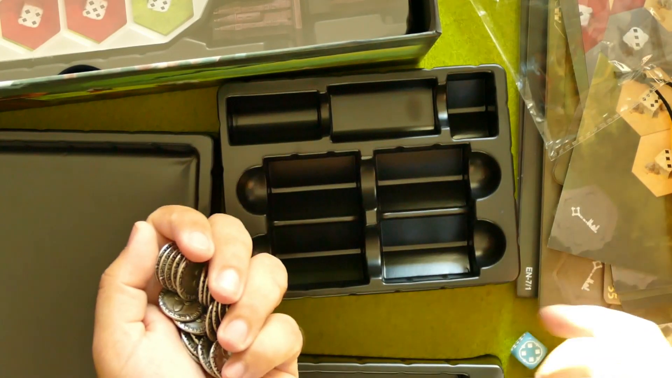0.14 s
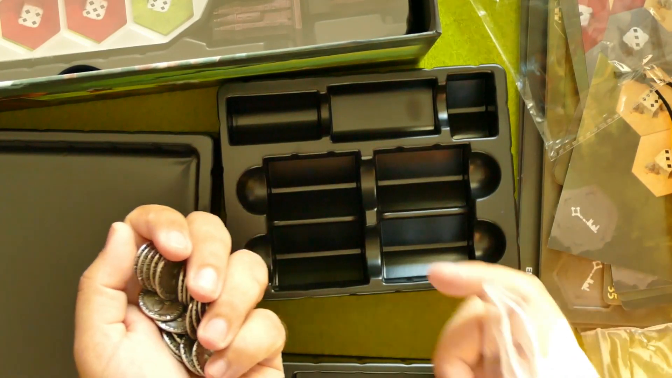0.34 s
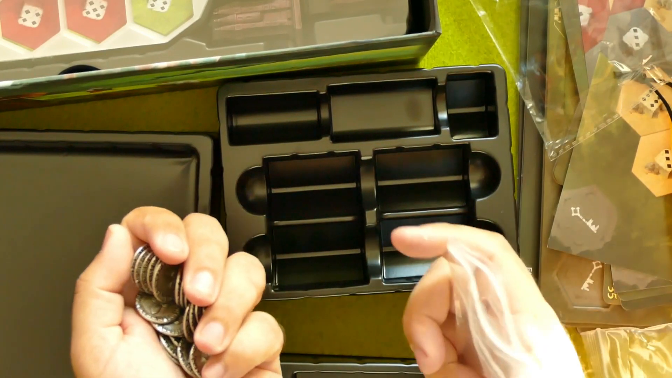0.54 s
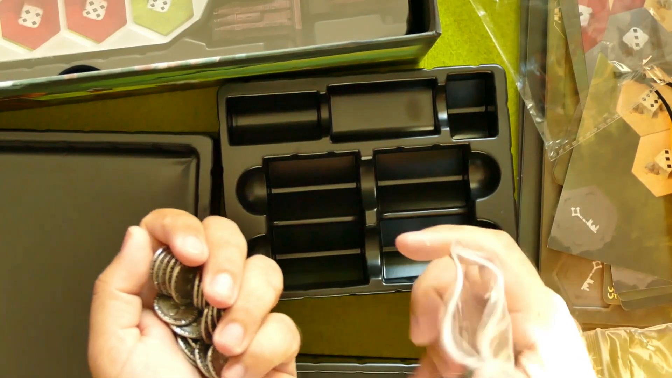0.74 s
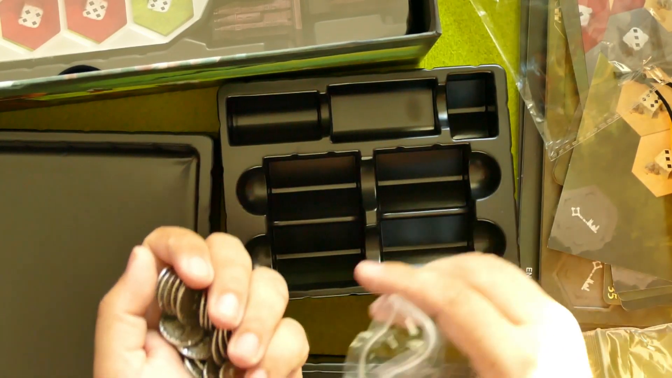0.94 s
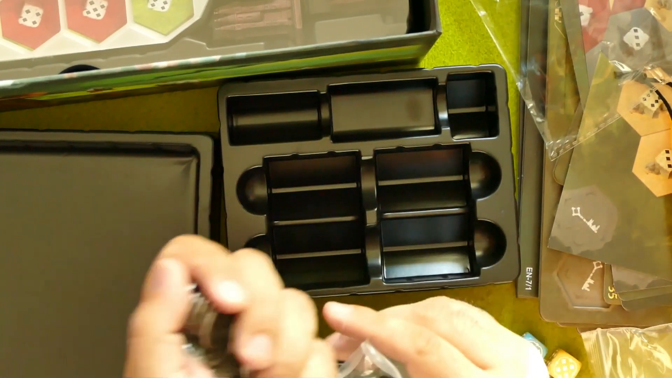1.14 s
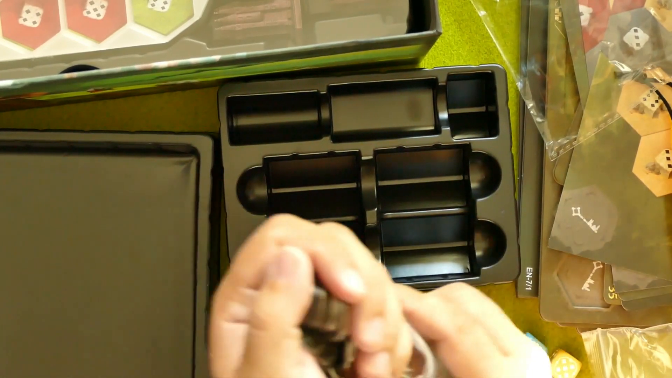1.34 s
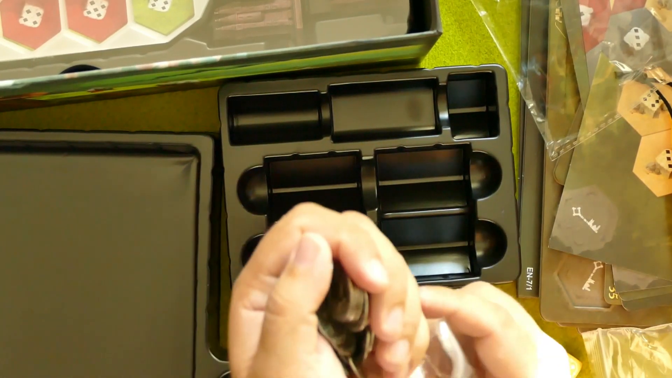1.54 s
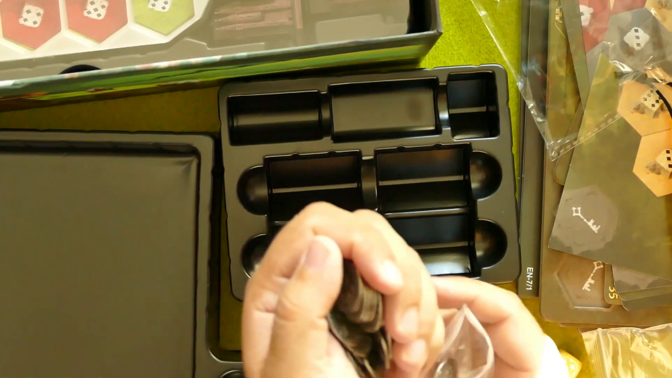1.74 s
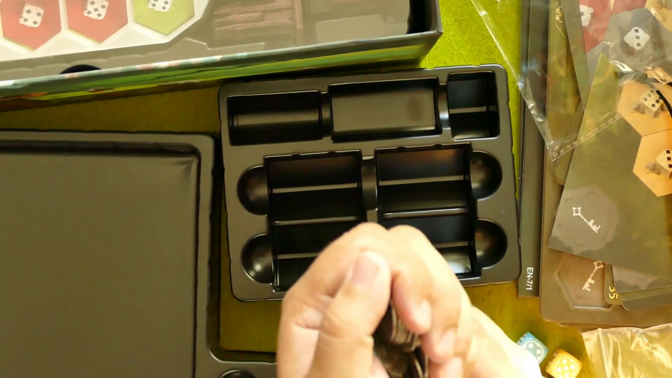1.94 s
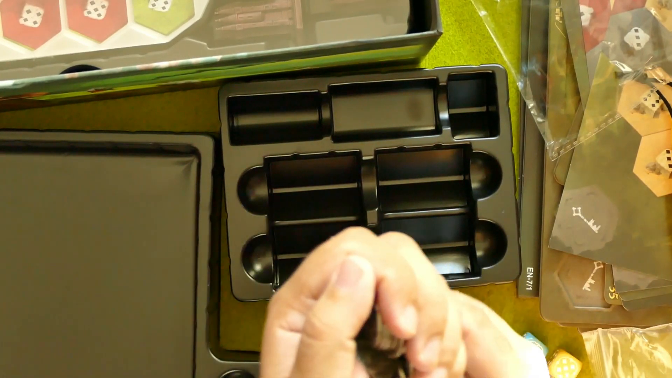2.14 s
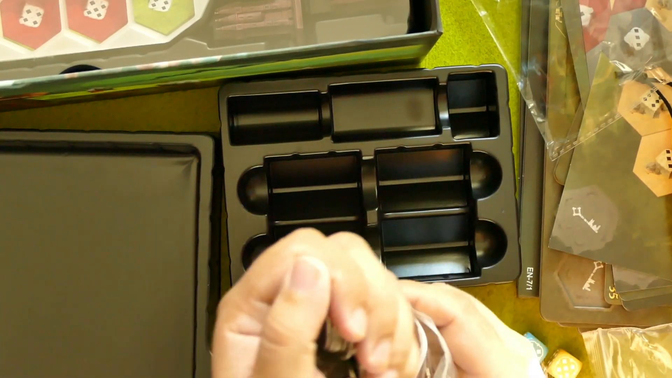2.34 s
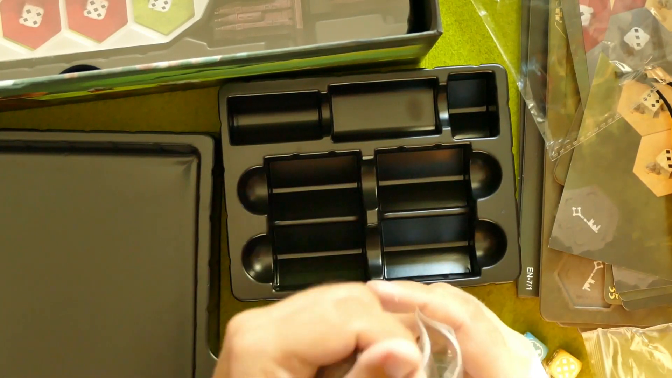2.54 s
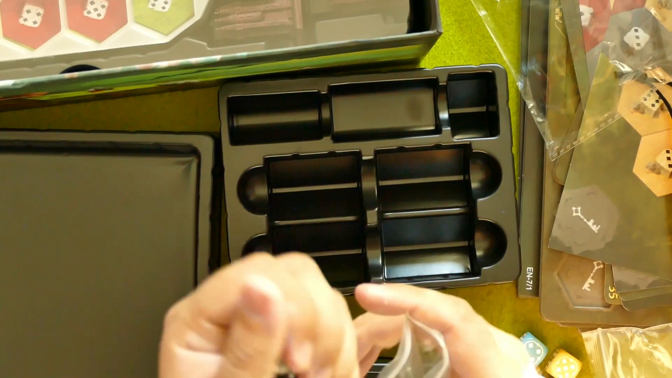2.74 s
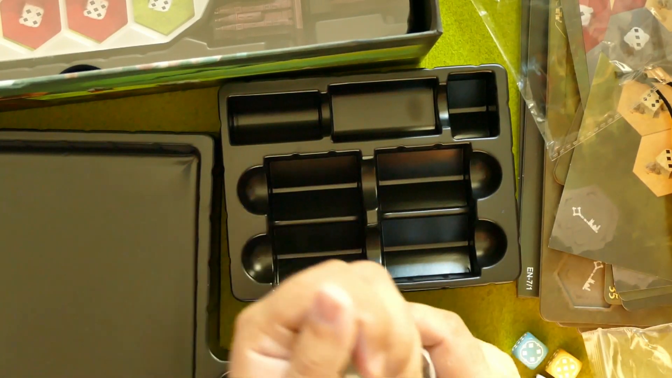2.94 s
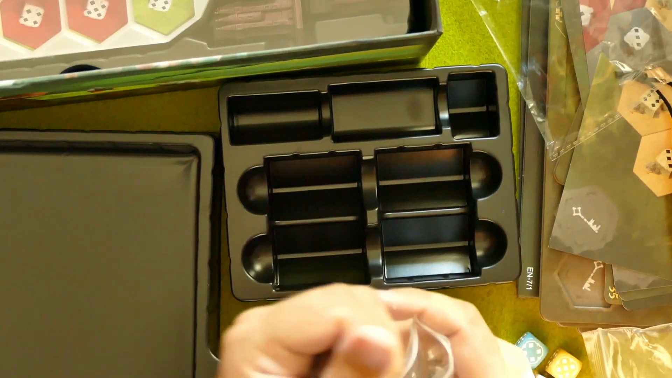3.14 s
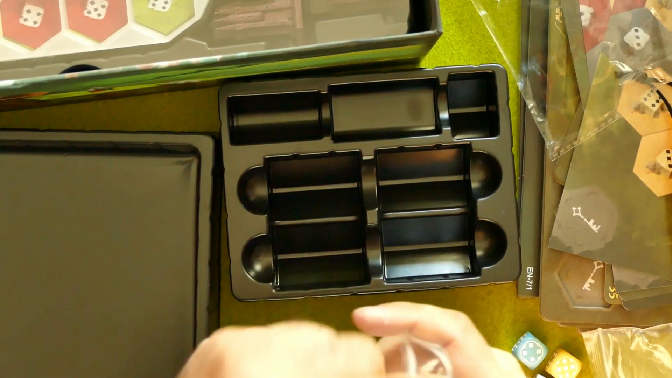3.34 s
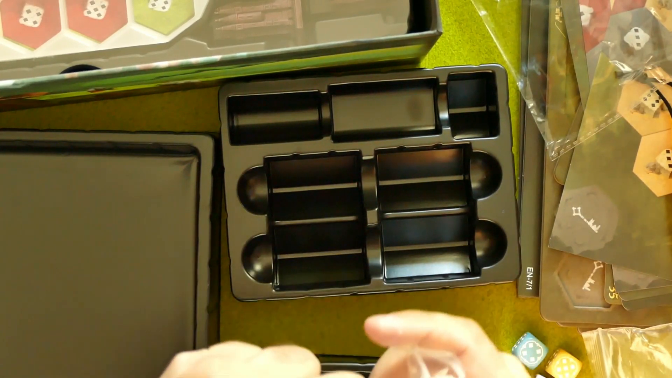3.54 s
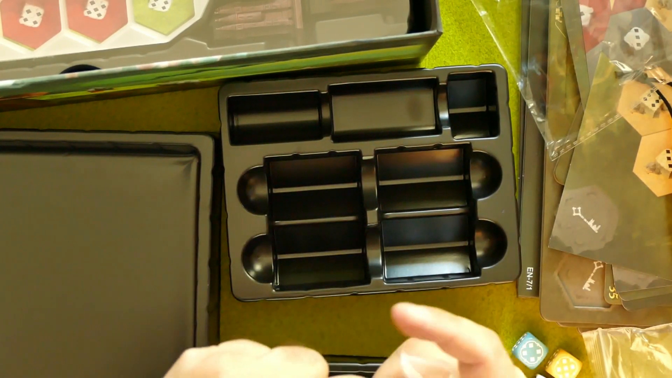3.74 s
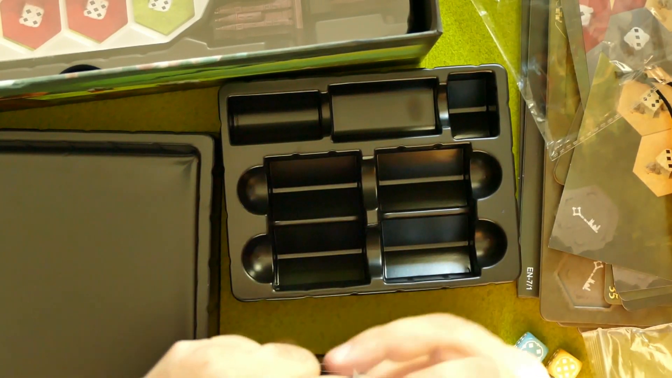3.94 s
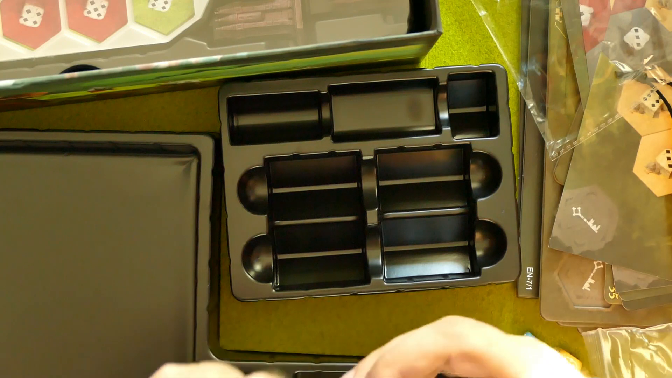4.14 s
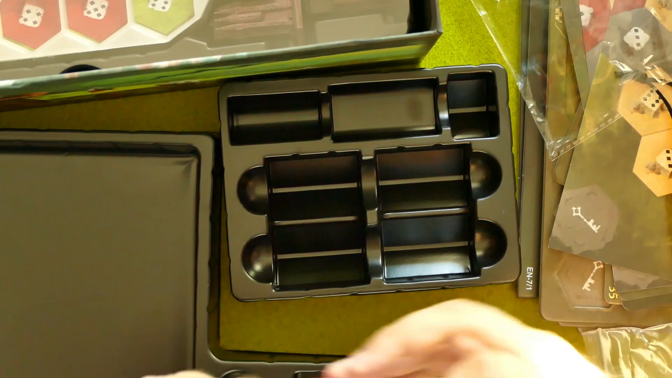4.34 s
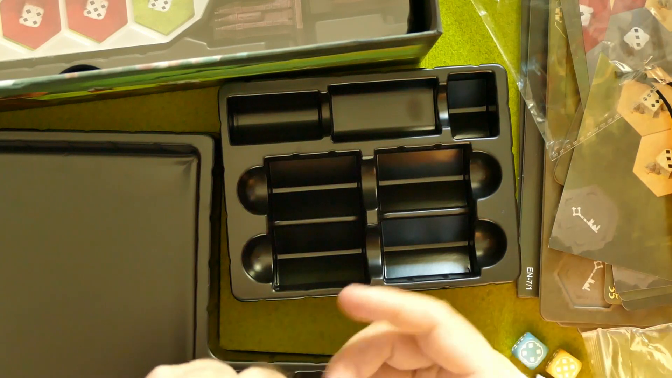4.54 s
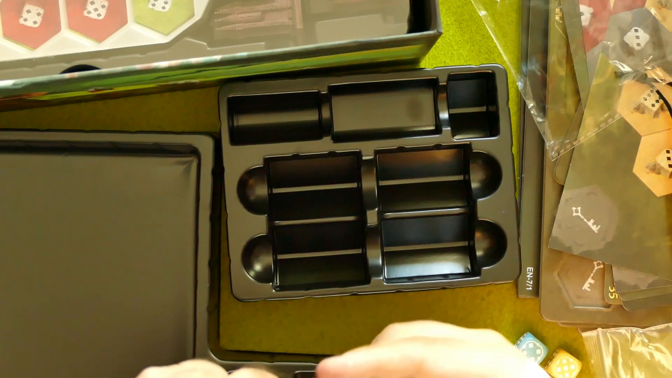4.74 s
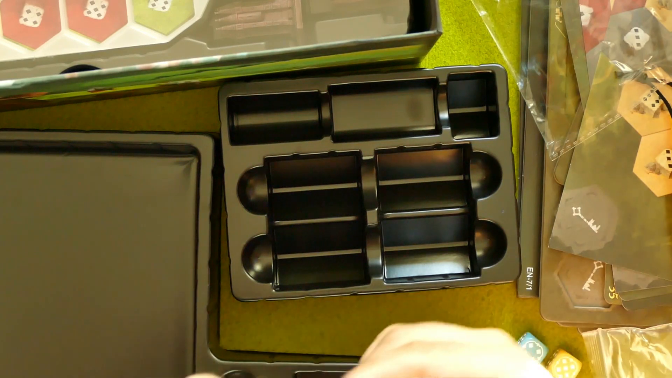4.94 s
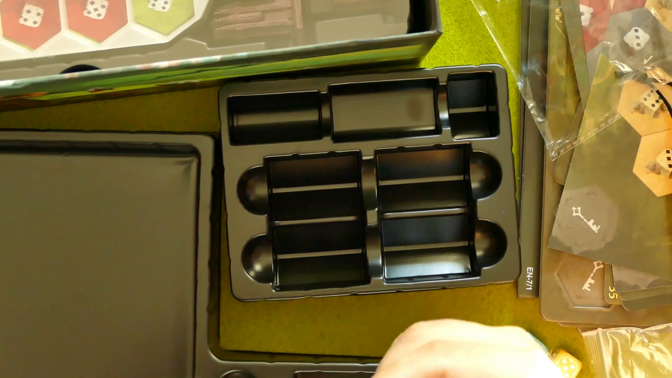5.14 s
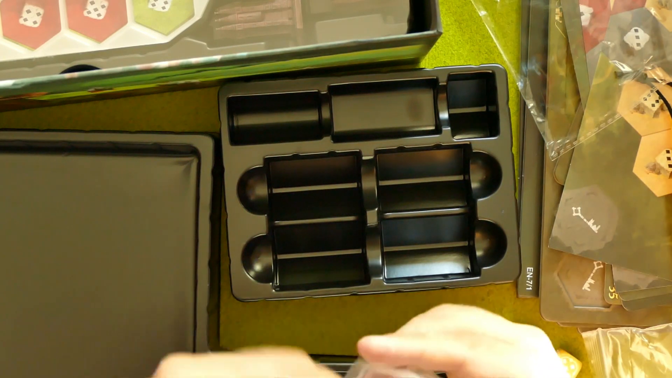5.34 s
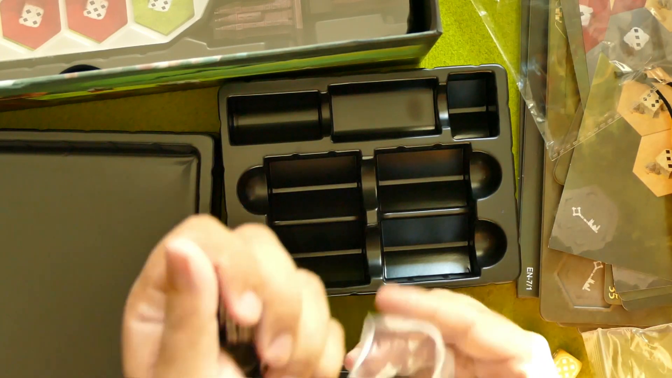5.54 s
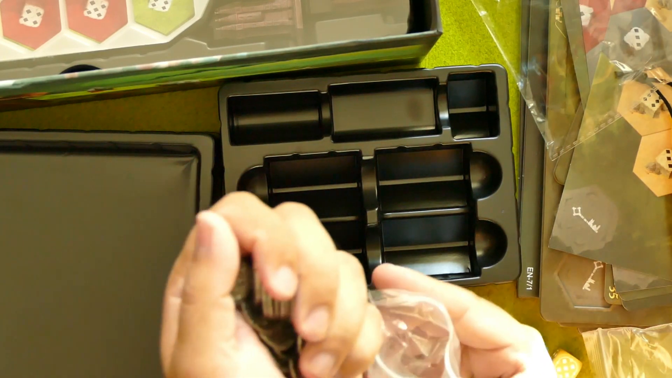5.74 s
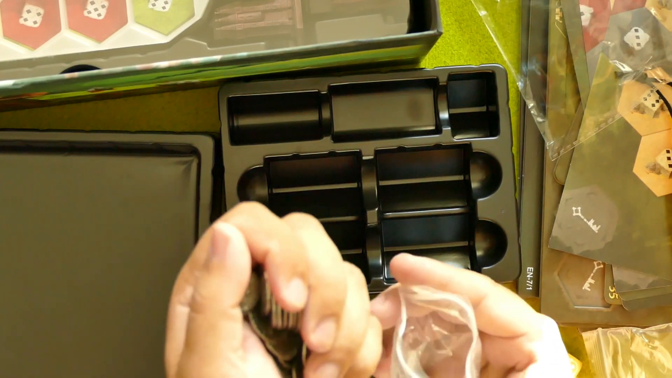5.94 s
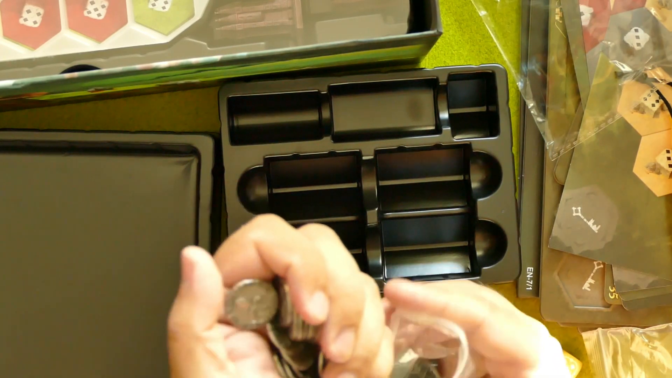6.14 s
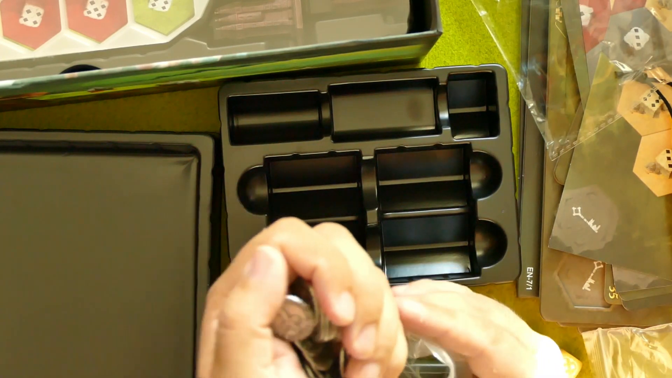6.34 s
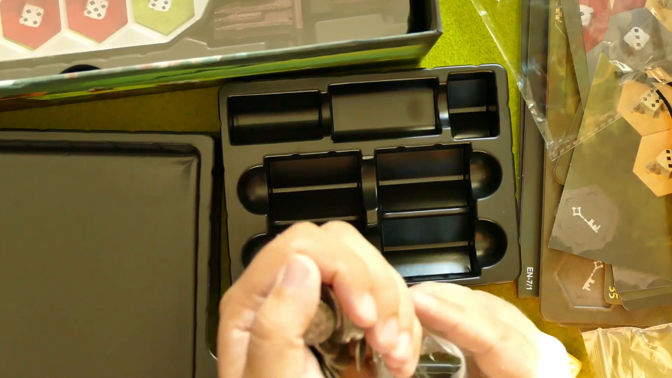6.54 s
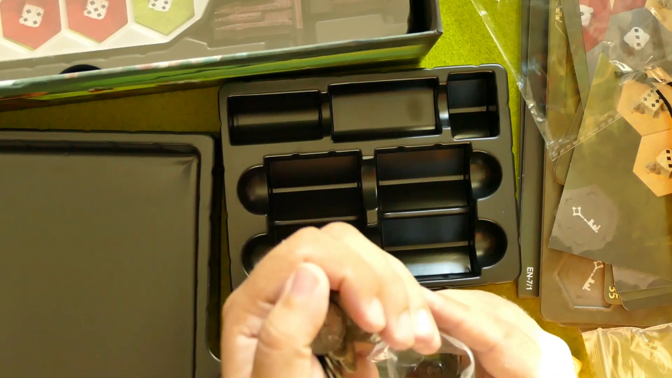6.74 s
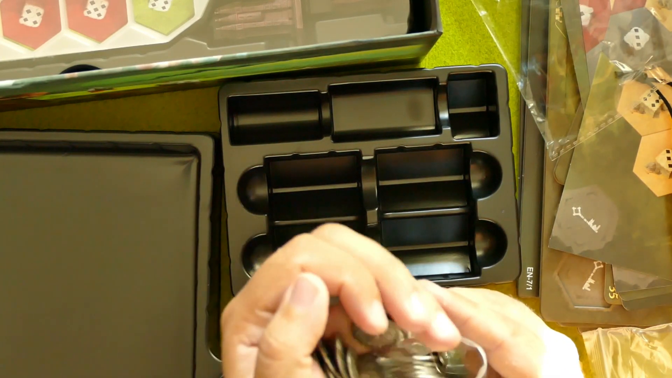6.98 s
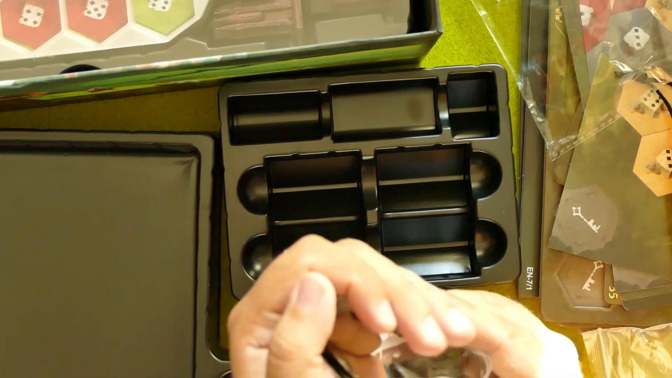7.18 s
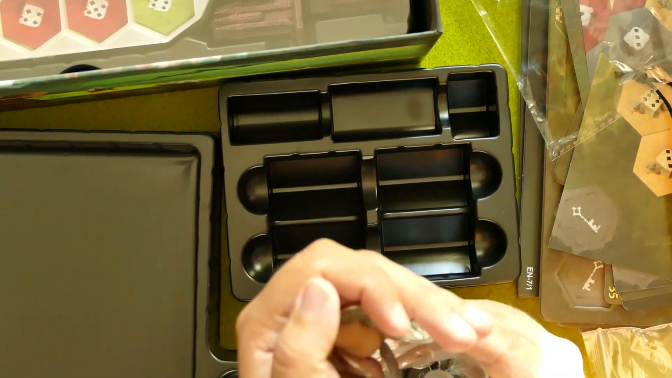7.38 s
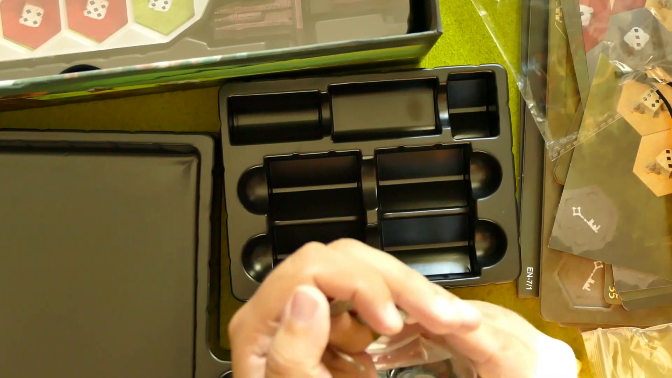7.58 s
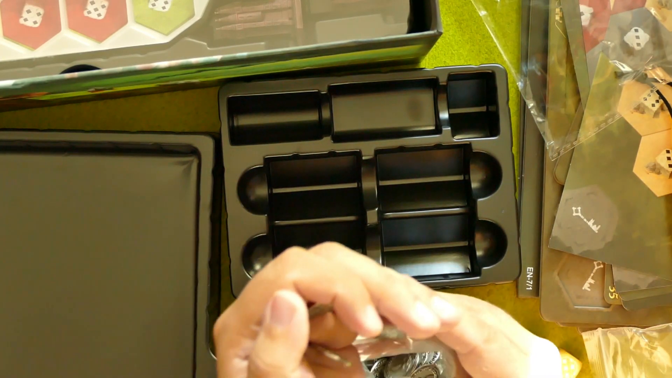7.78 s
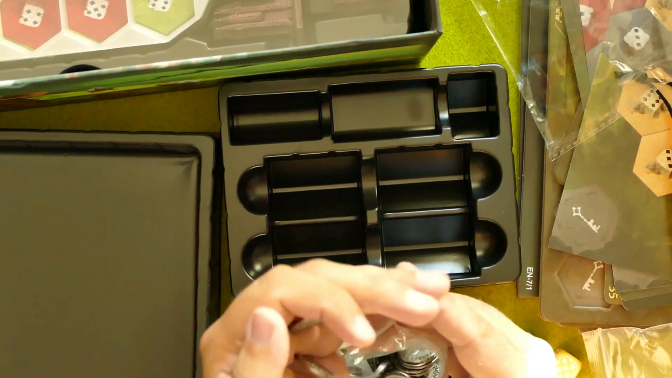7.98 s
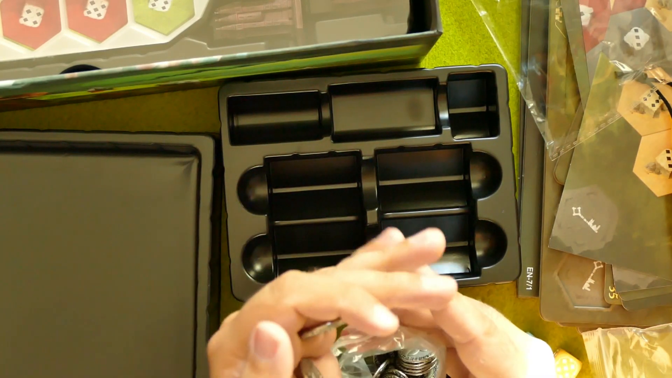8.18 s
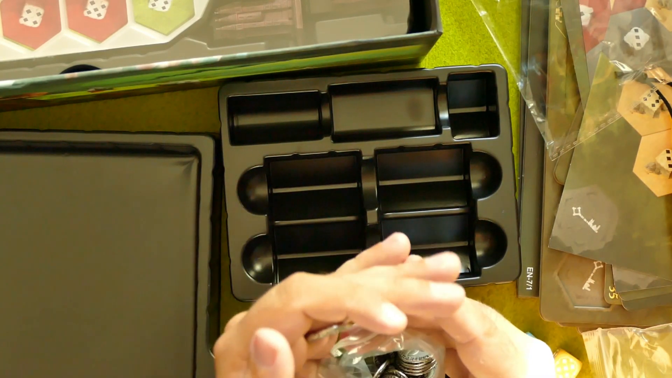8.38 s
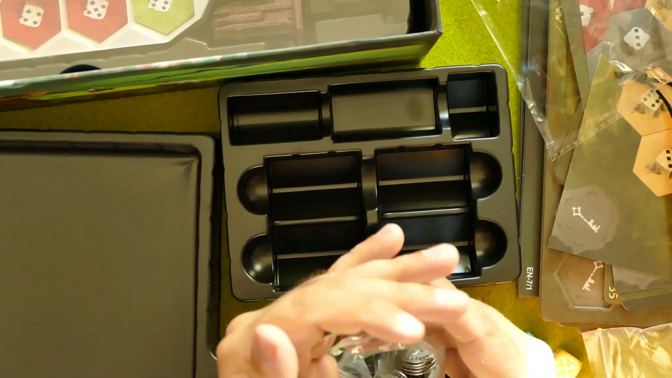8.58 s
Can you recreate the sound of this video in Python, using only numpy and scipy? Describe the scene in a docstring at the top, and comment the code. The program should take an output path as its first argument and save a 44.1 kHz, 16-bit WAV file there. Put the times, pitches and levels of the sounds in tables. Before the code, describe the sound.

Close, dry crackling of a plastic bag between sparse coin clinks, ending in a rapid metallic jingle and a dense rattling drop into the bag.

```python
"""Metal coins, a handful, are tipped into a small plastic bag close to the microphone in a quiet room.
They clink singly as decaying sines, then pour in a jingle of clicked resonators with a bright sliding hiss.
They knock and rattle on the heap as noise sounding through the resonances of the bag.
The film snaps and crinkles in filtered noise as fingers work it; short echoes and hiss lie behind."""
import sys
import numpy as np
from scipy import signal
from scipy.fft import rfft, irfft
from scipy.io import wavfile

SR = 44100
rng = np.random.default_rng(int(sys.argv[2]) if len(sys.argv) > 2 else 0)


def bounce(signal):
    """Save signal as a 16-bit WAV file at the path given by the first command-line argument."""
    frames = np.transpose(np.atleast_2d(signal))
    limited = np.clip(frames, -1, 1)
    pcm = np.round(limited * 32767).astype(np.int16)
    wavfile.write(sys.argv[1], SR, pcm)


N = 379877


def amp(db):
    """Gain of a level in dB."""
    return 10 ** (np.asarray(db) / 20)


def rms_one(x):
    """Scaled to rms 1."""
    return x / np.sqrt(np.mean(x ** 2) + 1e-20)


def in_time(rows):
    """Columns of a curve, one value a sample, -120 dB outside it."""
    s, *columns = np.transpose(rows)
    t = np.arange(N) / SR
    return [np.interp(t, s, column, left=-120, right=-120) for column in columns]


def swells(start_s, held_s, db, rise_db_per_s, fall_db_per_s):
    """Summed gains of gestures that rise, hold and die away at steady rates in dB."""
    t = np.arange(0, N / SR + .002, .001)[:, None]
    rise_db = rise_db_per_s * np.maximum(start_s - t, 0)
    fall_db = fall_db_per_s * np.maximum(t - start_s - held_s, 0)
    gain = amp(db - rise_db - fall_db).sum(axis=1)
    return np.interp(np.arange(N) / SR, t[:, 0], gain)


def resonance(x, hz, width_hz):
    """Two-pole peak with gain 1 on top."""
    r = np.exp(-np.pi * width_hz / SR)
    zeros = np.array([1, 0, -1]) * (1 - r * r) / 2
    poles = [1, -2 * r * np.cos(2 * np.pi * hz / SR), r * r]
    return signal.lfilter(zeros, poles, x + 1e-18)


def ring(clicks, hz, t60):
    """A unit click sets a sine of height 1 ringing, 60 dB down after t60 seconds."""
    r, w = amp(-60 / (t60 * SR)), 2 * np.pi * hz / SR
    return signal.lfilter([0, np.sin(w)], [1, -2 * r * np.cos(w), r * r], clicks + 1e-18)


def high(x, hz):
    """Second-order high-pass."""
    return signal.sosfilt(signal.butter(2, hz, "high", fs=SR, output="sos"), x)


def crisp(x):
    """The bright edge of a crackle."""
    return -resonance(high(x, 1820), 2500, 10100)


FILM_EDGE_HZ = 3700


def stiff(x, order=7):
    """Sound of the stiff film: no bass, fading above its edge."""
    edge = signal.butter(order, FILM_EDGE_HZ, fs=SR, output="sos")
    return signal.sosfilt(edge, rms_one(high(x, 233)))


def grains(per_s, spread_db):
    """Clicks at random moments, mostly small, a few large; rms 1."""
    sizes = amp(spread_db * np.minimum(rng.exponential(1, N), 4)) * rng.choice([-1, 1], N)
    return rms_one(sizes * (rng.random(N) < per_s / SR))


def puffed(per_s, steady, spread_db):
    """Envelope of many tiny puffs over a steady share."""
    fade = np.exp(-1 / (.0017 * SR))
    puffs = signal.lfilter([1], [1, -fade], np.abs(grains(per_s, spread_db)))
    return rms_one(puffs) + steady


def bursts(rows, sound, tail):
    """Lays one short sound, made from a dying burst of noise, at each row's moment."""
    out, t = np.zeros(N + 2048), np.arange(2048) / SR
    decay = np.exp(-t / .0012) + tail * np.exp(-t / .008)
    for (s, db, colour), noise in zip(rows, rng.standard_normal((len(rows), 2048))):
        parts = sound(noise * decay, colour)
        at = round(s * SR)
        out[at:at + 2048] += amp(db) * sum(amp(share_db) * part / np.abs(part).max()
                                           for share_db, part in parts)
    return out[:N]


# bending modes of each coin size: strong upper, strong lower, faint middle [Hz]
LARGE_MODES_HZ = (13350, 8600, 9450)
SMALL_MODES_HZ = (13770, 8840, 9875)


def coin_modes(k):
    """No two coins are tuned alike: five large (0-4) and five small (5-9)."""
    detune = .004 * (k % 5 / 2 - 1)
    return np.array(SMALL_MODES_HZ if k > 4 else LARGE_MODES_HZ) * (1 + detune)


# free coins striking each other close to the microphone:
# (time [s], level [dB], free until caught [s], size of the louder coin)
# struck on the face, the lower mode leads; pressed, the coin rings fainter
COIN_CLINKS = [(1.372, -32, 0.031, "large"), (1.421, -8.5, 0.005, "large pressed"),
               (1.4346, -9, .016, "large pressed"), (1.7958, -17.5, 0.015, "small pressed"),
               (3.005, -45, .03, "small face"), (3.033, -22, 0.0089, "small"),
               (3.043, -20, 0.0055, "small"), (5.467, -39, 0.035, "large"),
               (5.516, -20, .015, "large pressed"), (5.5374, -21, 0.045, "large"),
               (6.366, -28, 0.044, "small face"), (6.5182, -21, 0.012, "small"),
               (6.5922, -22, 0.0042, "small"), (6.648, -15, 0.003, "large pressed"),
               (6.689, -10, 0.017, "small"), (6.7481, -12.5, 0.002, "small"),
               (6.835, -11.5, 0.025, "small"), (6.917, -17.5, 0.031, "small"), (6.945, -18, 0.016, "small"),
               (7.027, -32, .02, "small"), (7.049, -18, 0.018, "large"), (7.081, -24, 0.0054, "small"),
               (7.131, -13, 0.039, "small"), (7.2484, -15, 0.019, "large"), (7.2773, -16, 0.0087, "large"),
               (7.328, -18.5, 0.018, "small"), (7.509, -24, 0.012, "large"),
               (7.5346, -15.5, 0.084, "small"), (7.6339, -14.5, 0.0026, "large"),
               (7.656, -13, 0.0074, "large"), (7.6657, -21, 0.0061, "large"), (7.759, -17, 0.013, "small"),
               (7.9737, -18.5, 0.0074, "small"), (7.99, -19, 0.024, "large")]
# the same three modes: (level [dB], t60 when free [s], fall of the ring when caught [dB])
COIN_RING = [(0, .3, -14), (-11, .38, -7), (-18, .15, -10)]
FACE_DB, PRESSED_DB = -27, -15  # upper mode in a face blow; ring of a pressed coin
CATCH_S, PARTNER_DB = .006, -5  # time constant of the catch; the struck coin
TUMBLE_HZ, TUMBLE_DEPTH = 70, .9  # fastest rate; share of the ring lost at the dip


def clinks():
    """Two coins ring freely after a blow until skin or film catches them; a faint ring lingers."""
    out, t = np.zeros(N + SR), np.arange(SR // 2) / SR
    mode_db, t60, caught_db = np.transpose(COIN_RING + COIN_RING)
    left = amp(caught_db)[:, None]
    partner_db = PARTNER_DB * (np.arange(6) > 2)
    luck = rng.random((len(COIN_CLINKS), 8))
    for (s, db, free_s, size), (one, other, *uneven) in zip(COIN_CLINKS, luck):
        uneven = np.array(uneven)
        lead = 1 + int(3 * one) + 5 * ("small" in size)
        hz = np.r_[coin_modes(lead), coin_modes(int(10 * other))]
        blow_db = FACE_DB * ("face" in size) * (mode_db == 0) + PRESSED_DB * ("pressed" in size)
        level_db = mode_db + blow_db + partner_db + 6 * (uneven - .5)
        decay = amp(level_db[:, None] - 60 * t / t60[:, None])
        rings = decay * np.sin(2 * np.pi * hz[:, None] * t)
        # a tumbling coin turns face and edge in turn
        turn = np.sin(np.pi * TUMBLE_HZ * uneven[::-1, None] * t) ** 2
        tumble = 1 - TUMBLE_DEPTH * turn
        held = left + (1 - left) * np.exp(-np.maximum(t - free_s, 0) / CATCH_S)
        at = round(s * SR)
        out[at:at + len(t)] += amp(db) * (held * tumble * rings).sum(axis=0)
    return out[:N]


# coins sliding over each other: (full from [s], held [s], contact level [dB], scrape level [dB])
COIN_SLIDES = [(1.43, 0.0064, -52.5, -37.5), (3.044, 0.014, -81, -39.5), (5.549, 0.028, -61, -29),
               (6.696, 0.0077, -44.5, -31.5), (6.845, 0.005, -43, -49), (6.925, 0.021, -42, -42),
               (7.041, 0.15, -42, -46), (7.261, 0.1, -44, -40.5), (7.666, 0.031, -43.5, -38),
               (7.994, 0.067, -54.5, -51)]
SLIDE_RISE_DB_PER_S, SLIDE_FALL_DB_PER_S = 381, 244
BOUNCE_DB, TICK_DB = -5.5, 4  # first small bounce against its clink; ticks of all contacts
HEAP_T60_SHARE = .25  # longest ring in the heap against a free coin


def jingle():
    """Sliding coins touch at random and each clink bounces six times within 36 ms; the coins ring damped."""
    s, clink_db = np.transpose([row[:2] for row in COIN_CLINKS])
    bounce_s = s[:, None] + np.cumsum(rng.uniform(.001, .006, (len(s), 6)), axis=1)
    at = np.round(bounce_s * SR).astype(int)
    slide_s, held_s, contact_db, _ = np.transpose(COIN_SLIDES)
    sliding = swells(slide_s, held_s, contact_db, SLIDE_RISE_DB_PER_S, SLIDE_FALL_DB_PER_S)
    blows = sliding * grains(per_s=1500, spread_db=3.5)
    blows[at] += amp(clink_db + BOUNCE_DB)[:, None] * amp(-2.5 * np.arange(6))
    ringing = blows.copy()
    ringing[at] *= amp([[PRESSED_DB * ("pressed" in row[-1])] for row in COIN_CLINKS])

    # each blow is dealt to one of the ten coins
    dealt, out = rng.integers(0, 10, N), np.zeros(N)
    for k in range(10):
        damping = HEAP_T60_SHARE * (1 - .5 * abs(k % 5 / 2 - 1))
        for hz, (db, t60, _) in zip(coin_modes(k), COIN_RING):
            out += amp(db) * ring(ringing * (dealt == k), hz, t60 * damping)
    # every contact also ticks, at one of sixteen pitches
    pitch, tick_hz = rng.integers(0, 16, N), np.linspace(8400, 14300, 16)
    ticks = sum(ring(blows * (pitch == k), hz, .005) for k, hz in enumerate(tick_hz))
    return out + amp(TICK_DB) * ticks


def scrape():
    """Sliding coin faces rub: a dense bright hiss."""
    slide_s, held_s, _, scrape_db = np.transpose(COIN_SLIDES)
    sliding = swells(slide_s, held_s, scrape_db, SLIDE_RISE_DB_PER_S, SLIDE_FALL_DB_PER_S)
    rub = rng.standard_normal(N) * puffed(per_s=900, steady=.2, spread_db=3.0)
    return sliding * rms_one(crisp(rub))


def struck(burst, modes):
    """A blow sets each resonance going with a strength and sign of its own."""
    strengths = amp(rng.normal(0, 3.0, len(modes))) * rng.choice([-1, 1], len(modes))
    return sum(g * amp(db) * resonance(burst, hz, w) for g, (hz, w, db) in zip(strengths, modes))


# resonances of the bag pouch between cupped hands: (frequency [Hz], width [Hz], level [dB])
POUCH_MODES = [(137, 180, -12.5), (352, 76, -5.5), (490, 120, -4), (691, 101, 0), (813, 195, -5),
               (953, 162, -4), (1260, 1200, -12.5)]
POCKET_WIDTH_HZ, POUCH_PITCH_HZ = 430, 764  # pouch modes scale with the pocket's pitch over the latter


def padded_knock(burst, colour):
    """Film and pouch sound around the air pocket's pitch, most treble is swallowed, a low thump joins."""
    hollow_db, pocket_hz = colour
    scaled_pouch = np.array(POUCH_MODES[1:]) * [pocket_hz / POUCH_PITCH_HZ, 1, 1]
    hollow = struck(resonance(burst, pocket_hz, POCKET_WIDTH_HZ), scaled_pouch)
    film = stiff(resonance(burst, 2500, 1740), order=8)
    thump = resonance(burst, 80, 117)
    return (-1.5, film), (hollow_db, hollow), (-14, crisp(burst)), (-27, thump)


# low padded knocks: a soft scuff of the bag, then coins knocking in it:
# (time [s], level [dB], hollow share [dB])
PADDED_KNOCKS = [(2.345, -49.5, 13.5), (5.045, -39.5, 12), (5.08, -33.5, 5.5), (5.163, -26, -0.5),
                 (5.291, -28.5, 0), (5.332, -38, 12.5), (7.7114, -26, 15), (7.7558, -13, 3),
                 (7.8082, -42, 20), (7.8371, 3, -8), (7.88, -10.5, -5), (7.9418, -9.5, 1),
                 (7.9544, -11, -24), (7.9708, -16, 4.5), (7.9897, -11, -12), (8.0217, -9, -4.5),
                 (8.0396, -15, -1.5), (8.0591, -10, -2), (8.0915, -26.5, 10.5), (8.11, -16, 6),
                 (8.1214, -15.5, 9), (8.1534, -15, 0.5), (8.1934, -36, 15), (8.2262, -20.5, 3.5),
                 (8.2477, -23, 7), (8.2654, -22, 6.5), (8.4452, -37, -30), (8.4996, -22, -18),
                 (8.5064, -19.5, -38), (8.553, -21.5, -19)]
# pitch of the air pocket in the bag: (time [s], frequency [Hz])
AIR_POCKET = [(5.4, 666), (7.7, 1037), (7.82, 984), (7.84, 754)]


def knocks():
    """Dying noise bursts, each coloured by the air pocket's pitch at that moment."""
    pocket_s, pocket_hz = np.transpose(AIR_POCKET)
    rows = [(s, db, (hollow_db, np.interp(s, pocket_s, pocket_hz))) for s, db, hollow_db in PADDED_KNOCKS]
    return bursts(rows, padded_knock, tail=.36)  # share of slower after-rustle


def snap(burst, hz):
    """A short burst rings at its own pitch, shakes film and pouch and has a bright edge."""
    tone = resonance(resonance(burst, hz, .36 * hz), hz, .3 * hz)
    return (1.5, tone), (-4.5, stiff(burst)), (-7.5, struck(burst, POUCH_MODES)), (2, crisp(burst))


# short noise bursts: mostly film snaps, with a damped coin clink and two low thumps:
# (time [s], level [dB], pitch [Hz])
SHORT_BURSTS = [(0.243, -26.5, 2180), (0.2811, -27, 2200), (0.3481, -45, 2230), (0.4769, -30.5, 2330),
                (0.564, -37, 2180), (0.837, -35.5, 2120), (0.8794, -36, 2600), (1.5, -30.5, 626),
                (1.555, -20.5, 2200), (1.5786, -22, 2130), (1.6062, -32, 2350), (1.6544, -25, 2670),
                (1.7991, -25.5, 2640), (1.8164, -25.5, 2730), (1.9026, -35, 1710), (1.9321, -29.5, 4270),
                (2.0183, -20.5, 2300), (2.024, -28.5, 556), (2.1326, -39.5, 2150), (2.2428, -31.5, 2620),
                (2.402, -33, 2570), (2.437, -34.5, 4030), (2.483, -33, 4860), (2.7596, -36, 3600),
                (2.882, -33, 2930), (2.955, -33.5, 2520), (3.2028, -29.5, 2040), (3.149, -34.5, 11200),
                (3.524, -30, 4300), (3.7729, -31, 1800), (3.874, -30, 3070), (4.0034, -21, 3660),
                (4.062, -26.5, 2500), (4.1152, -24, 2840), (4.2171, -25.5, 3000), (4.2623, -14, 3300),
                (4.355, -30, 3580), (4.4523, -23.5, 2300), (4.4962, -20.5, 3220), (4.575, -28.5, 3680),
                (4.7038, -27, 2550), (4.7553, -25.5, 2140), (4.8324, -21, 3240), (4.954, -28.5, 3240),
                (4.9665, -20.5, 1830), (5.062, -27, 3500), (5.1192, -19.5, 2400), (5.1771, -22, 2280),
                (5.25, -28, 2450), (5.3782, -26.5, 3850), (5.3981, -23.5, 12400), (5.576, -25, 6500),
                (5.6438, -18.5, 2600), (5.8282, -27, 2760), (5.8496, -31, 3550), (5.963, -36.5, 2400),
                (6.3119, -24.5, 4100), (6.3555, -30, 3900), (6.3814, -32.5, 1900), (6.6856, -20.5, 4200),
                (7.0475, -13, 2350), (7.5346, -21.5, 2040), ]


def snaps():
    """Dying noise bursts, each at a pitch of its own, mostly the film snapping."""
    return bursts(SHORT_BURSTS, snap, tail=.18)  # share of slower after-rustle


def body(x, modes):
    """Resonances in parallel, signs alternating; rms 1."""
    return rms_one(sum((-1) ** k * amp(db) * resonance(x, hz, w) for k, (hz, w, db) in enumerate(modes)))


# continuous crinkle: bag worked in the fingers, then coins rattling on the heap: (time [s], level [dB])
CRINKLE_LEVEL = [(0, -54.5), (0.6, -63), (1.0, -65), (1.4, -48.5), (2.0, -40.5), (2.2, -54.5), (3.2, -61),
                 (3.8, -57.5), (4.0, -45.5), (4.5, -45), (5.3, -46), (6.2, -56.5), (6.5, -55), (6.9, -40.5),
                 (7.3, -41), (7.5, -49.5), (7.95, -32), (8.33, -37), (8.42, -70), (8.62, -99)]
# how the bag is held, cupped or spread open: (time [s], hollow share [dB], crisp share [dB])
BAG_GRIP = [(0, -1, -11), (1.3, -11, -3.5), (4.3, -4, -5.5), (5.3, -12, -8.5), (6.4, -9, -9),
            (7.66, -1.5, -2.5), (7.72, -1.5, -30), (8.35, -2.5, -38), (8.62, -39, 17)]
# short squeezes, each a burst of crinkle: (full from [s], held [s], crinkle level [dB])
BAG_SQUEEZES = [(0.245, 0.16, -54.5), (1.556, 0.11, -46.5), (2.018, 0.0097, -62), (2.482, 0.032, -50),
                (2.548, 0.011, -49.5), (2.734, 0.02, -49.5), (3.046, 0.0083, -40.5), (3.525, 0.048, -51),
                (3.935, 0.022, -36), (4.218, 0.015, -33.5), (4.264, 0.0099, -27), (5.032, 0.03, -40.5),
                (5.246, 0.051, -41), (5.54, 0.19, -50.5), (6.319, 0.083, -63), (6.544, 0.0072, -40.5),
                (6.684, 0.022, -27), (6.819, 0.011, -35), (7.047, 0.0043, -27)]
SQUEEZE_RISE_DB_PER_S, SQUEEZE_FALL_DB_PER_S = 2500, 273


def crinkle():
    """Each tiny buckle or rattle is a puff of noise heard through film, pouch and as a crisp edge."""
    (steady_db,), (hollow_db, crisp_db) = in_time(CRINKLE_LEVEL), in_time(BAG_GRIP)
    squeezing = swells(*np.transpose(BAG_SQUEEZES), SQUEEZE_RISE_DB_PER_S, SQUEEZE_FALL_DB_PER_S)
    level = amp(steady_db) + squeezing
    middle, low, top = rng.standard_normal((3, N)) * puffed(per_s=450, steady=.2, spread_db=3.1)
    # folds of different sizes take turns, each with a colour of its own
    turn = np.repeat(rng.integers(0, 6, N // 128 + 1), 128)[:N]
    fold_hz = np.geomspace(1250, 4600, 6)
    folds = sum(resonance(middle * (turn == k), hz, .4 * hz) for k, hz in enumerate(fold_hz))
    hollow = amp(hollow_db) * body(low, POUCH_MODES)
    edge = amp(crisp_db) * rms_one(crisp(top))
    return level * (stiff(folds) + hollow + edge)


# narrow film tone, silent at these values:
# (full from [s], held [s], level [dB], frequency [Hz], width [Hz])
FILM_TONE = (5.39, -1.5, -54, 2220, 40)


def film_tone():
    """Noise through two equal narrow resonances; the negative hold time keeps it silent."""
    s, held_s, db, hz, width_hz = FILM_TONE
    tone = resonance(resonance(rng.standard_normal(N), hz, width_hz), hz, width_hz)
    return swells(s, held_s, db, SLIDE_RISE_DB_PER_S, SLIDE_FALL_DB_PER_S) * rms_one(tone)


ROOM_T60_S, ROOM_DB, WALL_CUT_HZ = .2, -15, 9000


def room(x):
    """Eight feedback delays, duller on every round, stepped block by block."""
    out, dull = np.zeros(N), np.exp(-2 * np.pi * WALL_CUT_HZ / SR)
    lags = (rng.uniform(.008, .027, 8) * SR).astype(int)
    for k, lag in enumerate(lags):
        loop, gain, state = x.copy(), amp(-60 * lag / SR / ROOM_T60_S), [0.]
        for i in range(lag, N, lag):
            back, state = signal.lfilter([gain * (1 - dull)], [1, -dull], loop[i - lag:i], zi=state)
            loop[i:i + lag] += back[:N - i]
        out += (loop - x) * (-1) ** k
    return out


# spectrum of room and microphone hiss: (frequency [Hz], relative density [dB])
HISS = [(25, 5), (208, 4.5), (470, 6), (1320, -6), (2460, -14), (4860, -15), (15200, -16)]
HISS_DB = -53.5  # rms


def air():
    """Steady noise coloured as room and microphone hiss."""
    hz = np.maximum(np.arange(N // 2 + 1) * SR / N, 1)
    curve_hz, curve_db = np.transpose(HISS)
    shape = amp(np.interp(np.log(hz), np.log(curve_hz), curve_db))
    return amp(HISS_DB) * rms_one(irfft(rfft(rng.standard_normal(N)) * shape, N))


def scene():
    """Coins and bag, their room echo and the hiss."""
    coins = clinks() + jingle() + scrape()
    bag = knocks() + snaps() + crinkle() + film_tone()
    hands = coins + bag
    return (hands + amp(ROOM_DB) * room(hands) + air())[None]


CUTOFF_HZ = 15750


def record(dry):
    """Peaks beyond full scale clip, then a steep low-pass cuts the top."""
    low_pass = signal.ellip(12, .5, 70, CUTOFF_HZ, fs=SR, output="sos")
    return signal.sosfilt(low_pass, np.clip(dry, -1, 1))


dry = scene()
out = record(dry)
bounce(out)
```